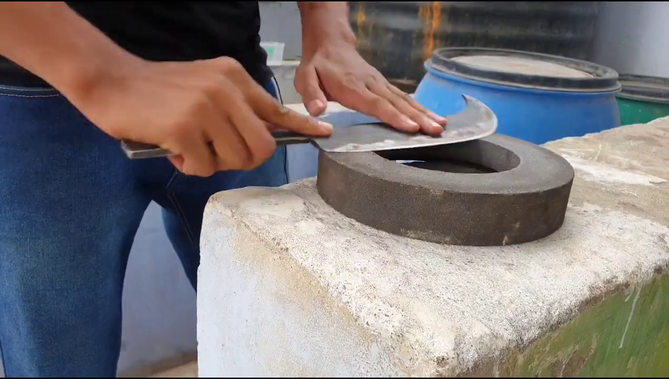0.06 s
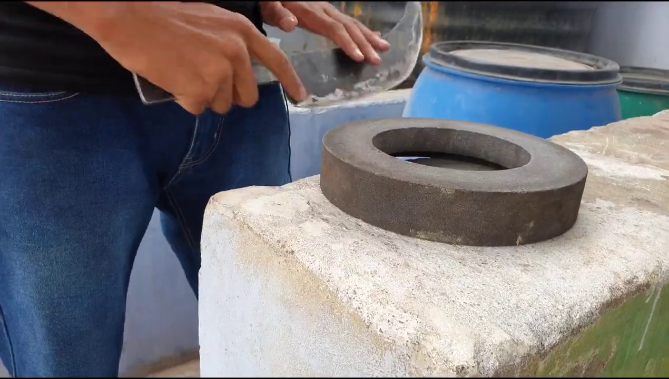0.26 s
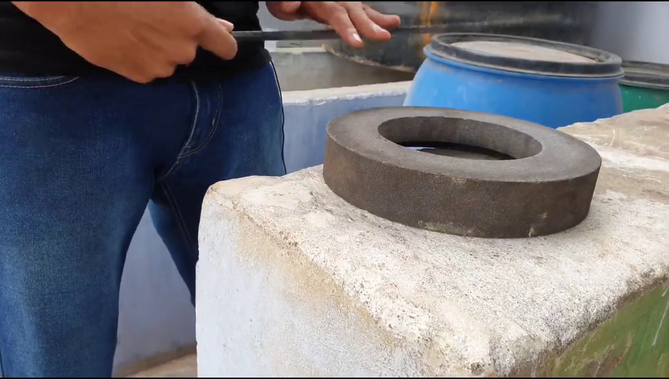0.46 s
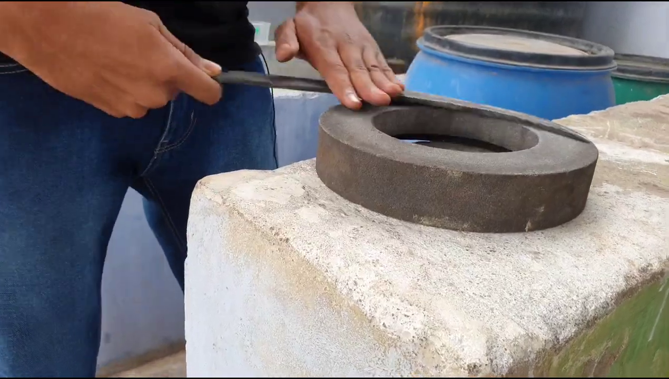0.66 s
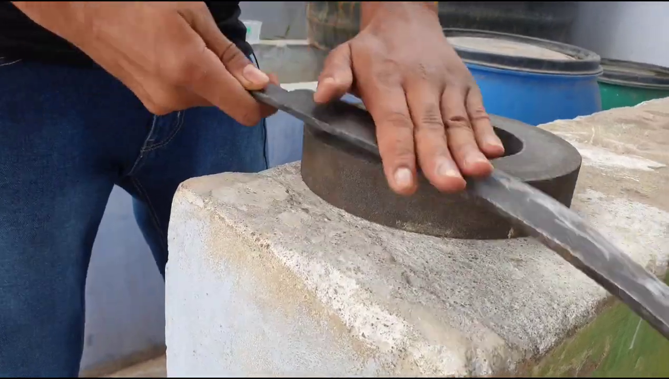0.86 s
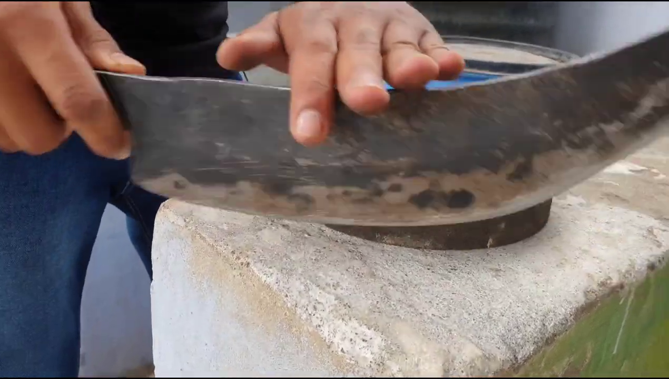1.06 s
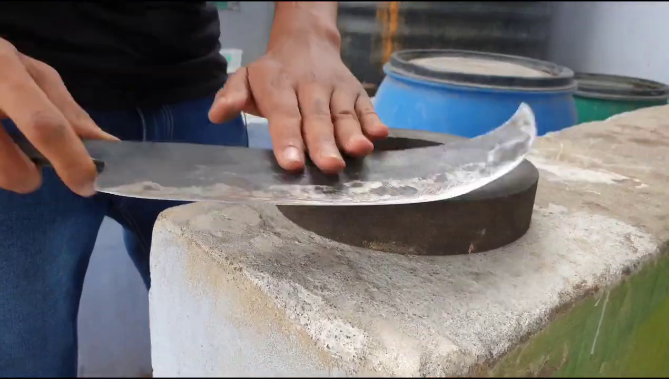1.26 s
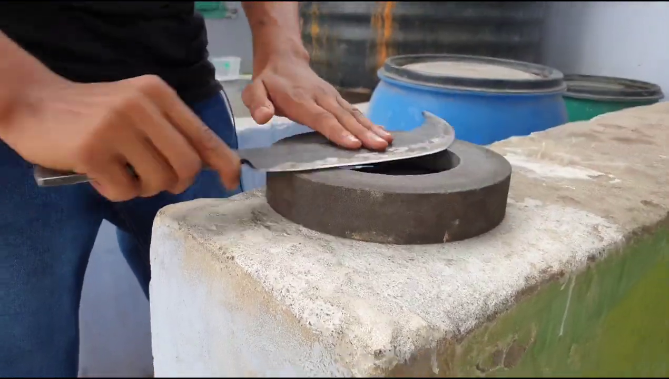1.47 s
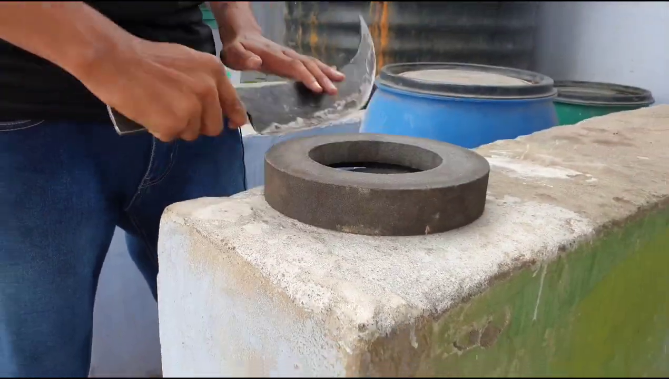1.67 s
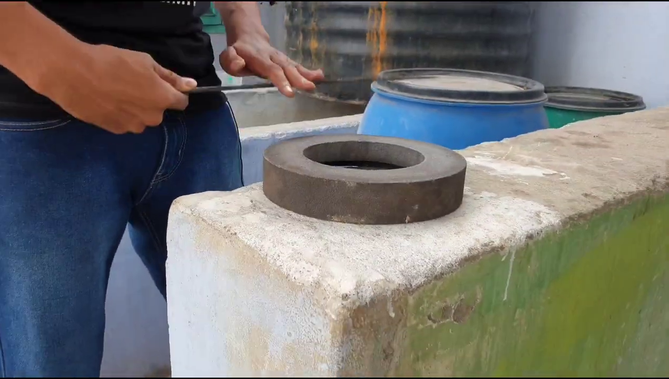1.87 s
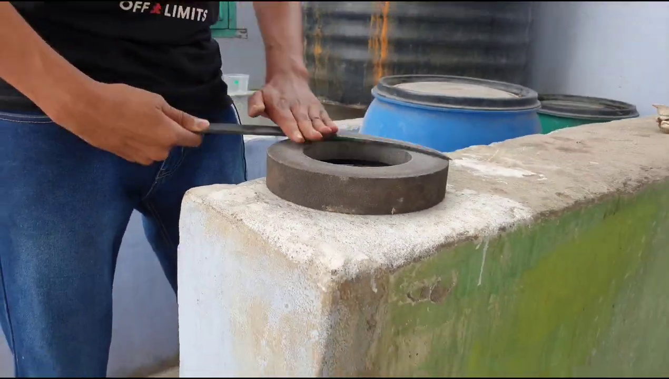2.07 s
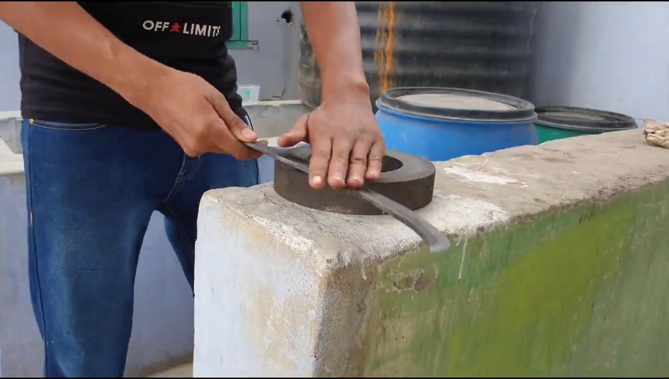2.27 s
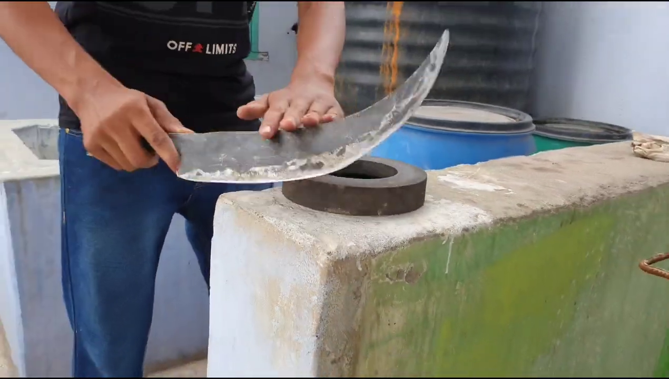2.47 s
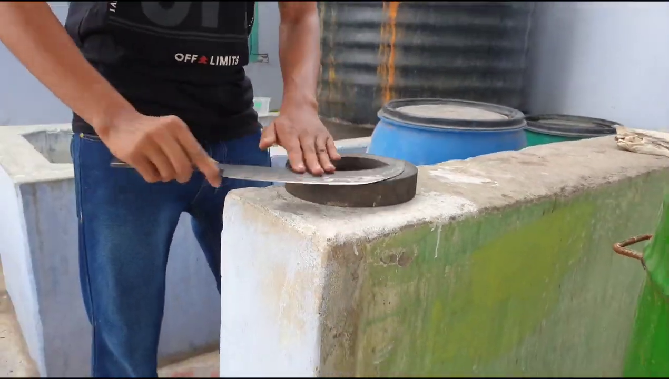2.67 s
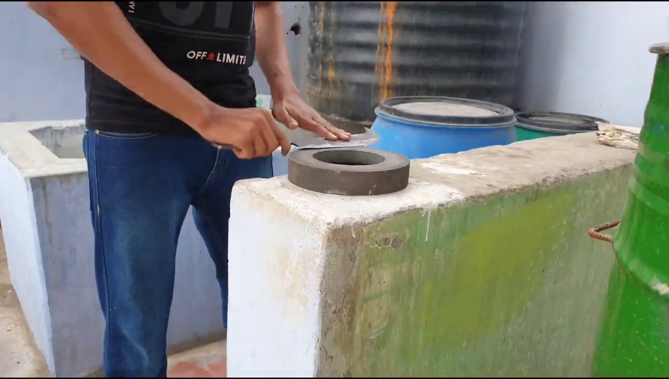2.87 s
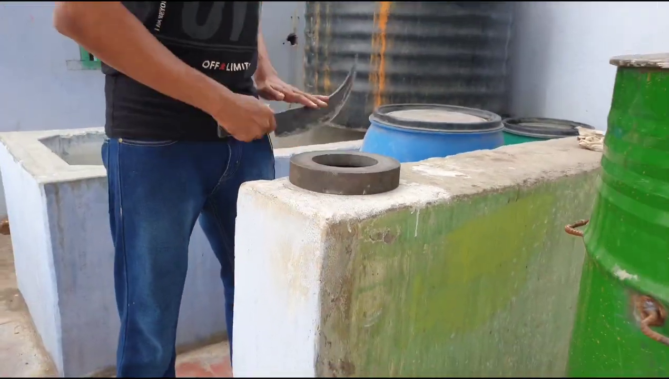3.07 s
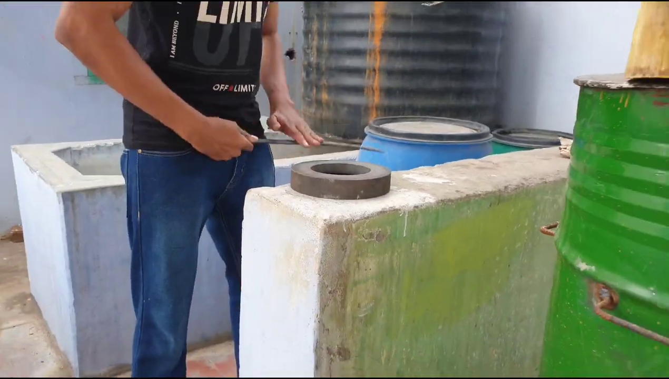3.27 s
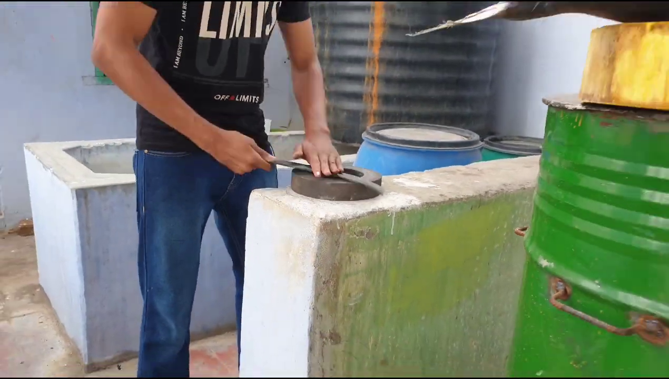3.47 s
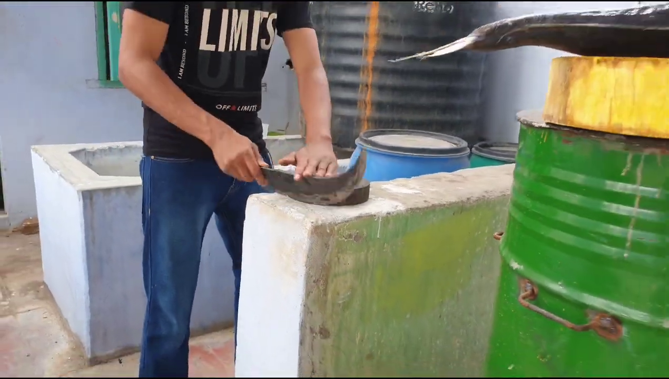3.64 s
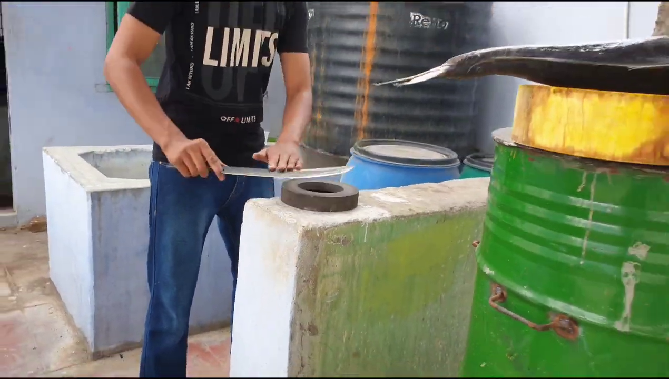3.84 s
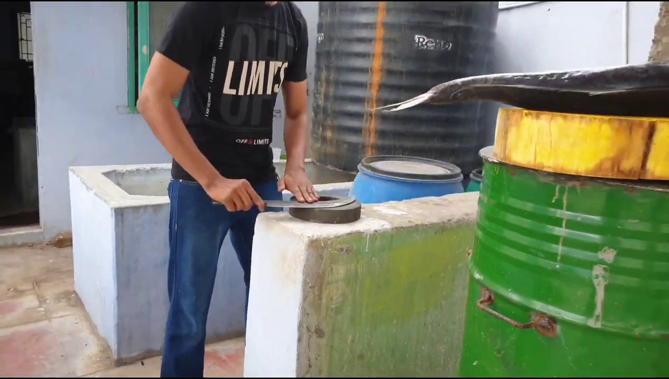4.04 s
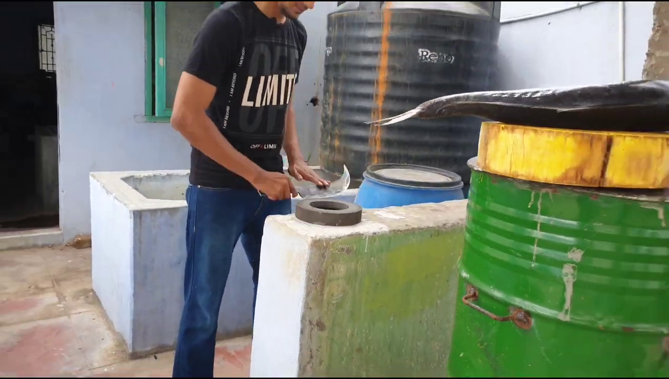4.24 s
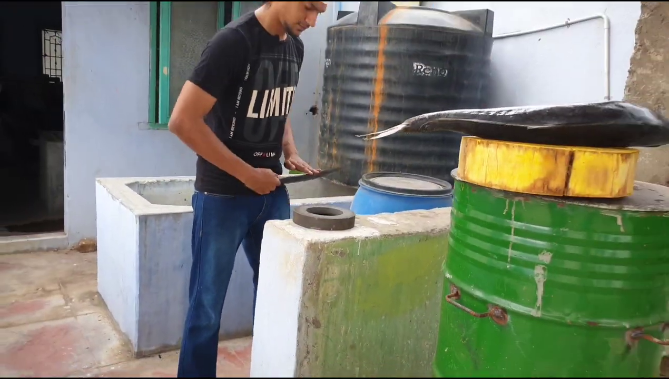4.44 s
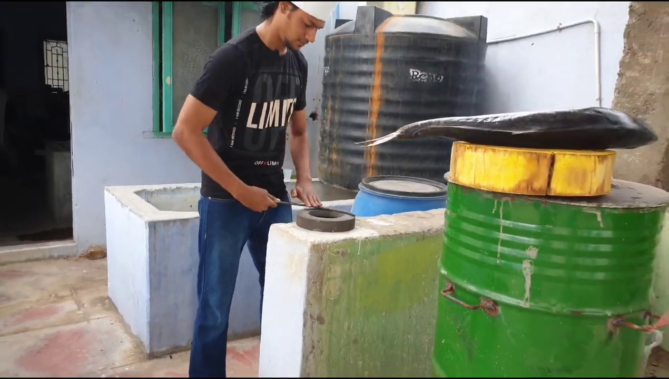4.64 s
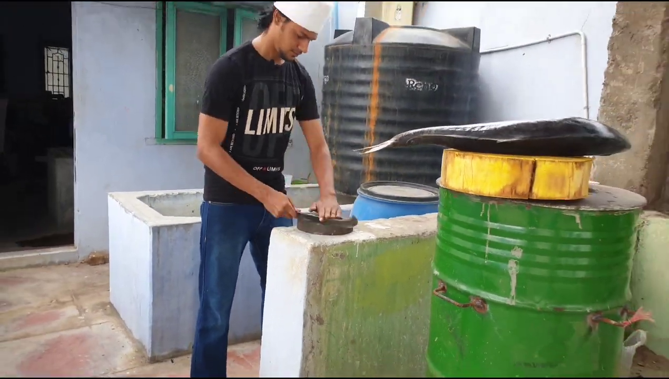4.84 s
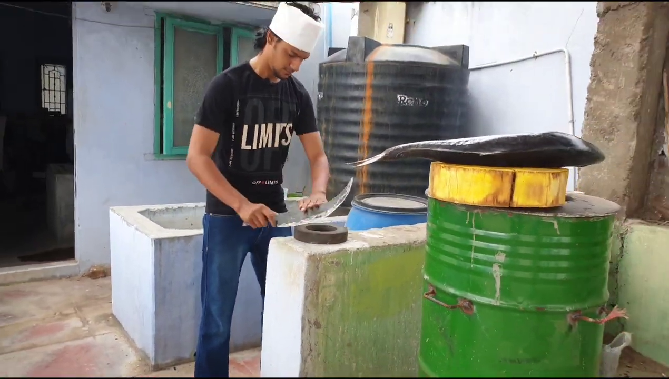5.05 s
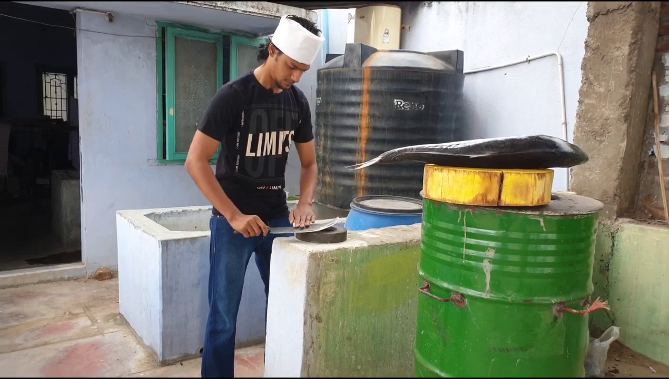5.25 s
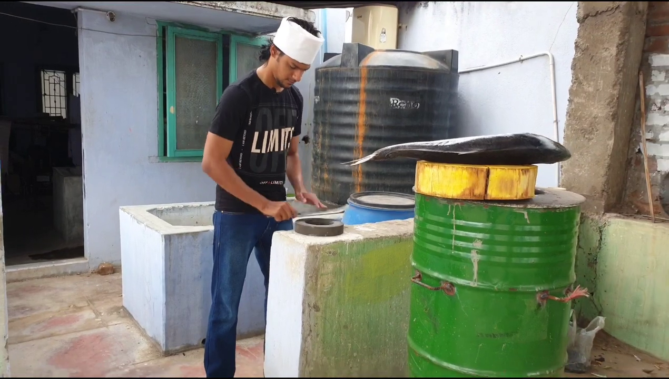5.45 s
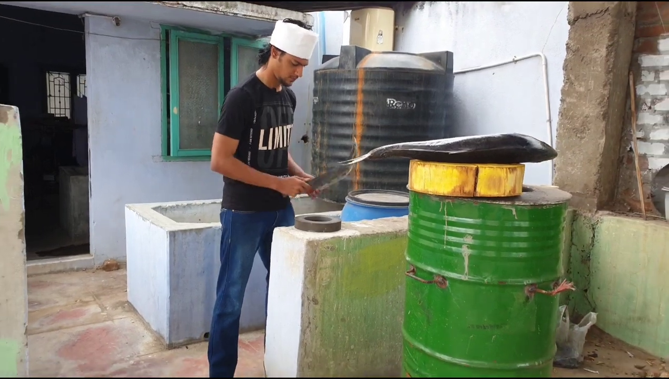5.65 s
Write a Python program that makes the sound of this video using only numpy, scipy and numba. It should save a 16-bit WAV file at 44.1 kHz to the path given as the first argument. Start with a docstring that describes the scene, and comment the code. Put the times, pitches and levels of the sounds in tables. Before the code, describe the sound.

Steady whetting of a big knife on coarse stone: knock, rough metallic rasp, brief ring on lifting, repeated about every 0.7 seconds in a walled yard.

```python
"""A heavy steel blade is whetted on a ring-shaped stone in a walled yard, nine strokes on alternating faces.
Strokes land with knocks, grains of grit drive damped modes of steel and stone, and the lifted blade rings out.
A decaying noise tail gives the walls' return. Behind lie town hush and a distant engine rumble, both of
filtered noise, then a faint far whine of one trembling tone, and a thin high squeal of two in a veil of hiss."""
import sys
import numpy as np
from scipy import signal
from scipy.fft import rfft, irfft
from scipy.io import wavfile
from scipy.ndimage import uniform_filter1d
from numba import njit

SR = 44100
rng = np.random.default_rng(int(sys.argv[2]) if len(sys.argv) > 2 else 0)


def transcribe(signal):
    """Save signal, clipped to [-1, 1], as a 16-bit WAV file at the path in sys.argv[1]."""
    frames = np.atleast_2d(signal).T
    limited = np.clip(frames, -1, 1)
    pcm = np.round(limited * 32767).astype(np.int16)
    wavfile.write(sys.argv[1], SR, pcm)


N = 251811

# strokes on the stone, faces alternating: (lands [s], lifts [s], grumble relative to growl [dB],
# then four lead partials at mid-stroke, relative to the ring [dB])
STROKES = [(0.0, 0.26, -6.5, -9, -6, -18, -9), (0.693, 0.962, -5, -1.5, -4.5, -13, -8),
           (1.404, 1.726, -8, -14, -8.5, -6.5, -17), (2.093, 2.345, -3.5, 2, -1.5, -13, -15),
           (2.784, 3.021, -7.5, -10.5, -2.5, -7.5, -25), (3.427, 3.642, -7.5, -12.5, -1.5, -8, -9.5),
           (4.097, 4.371, -8, -18, -12, -10.5, -7), (4.714, 4.975, -7.5, -13, -11.5, -8.5, -8.5),
           (5.379, 5.488, -1.5, -14, -6, -23, -6.5)]
# the edge springing off at each lift: (looseness of the hand [share of free t60],
# then pluck of each of the four lead partials, relative level [dB])
LIFT = [(0.59, -56, -36.5, -39, -35), (0.59, -36, -31.5, -32, -61), (0.7, -36, -35, -26, -40),
        (0.72, -49, -41, -35.5, -38.5), (0.5, -48, -26, -30, -42.5), (0.59, -50, -65, -36, -62),
        (0.82, -57.5, -39.5, -41.5, -44), (0.73, -44.5, -36, -29, -53), (0.79, -55, -48, -45, -34)]


def from_db(db):
    """Decibels to gain."""
    return np.exp(np.asarray(db) * (np.log(10) / 20))


def rms_one(x):
    """Scale to rms 1."""
    return x / np.sqrt(np.mean(x ** 2) + 1e-20)


def in_time(rows, outside=None):
    """Columns of a curve table, sample by sample."""
    s, *columns = np.transpose(rows)
    t = np.arange(N) / SR
    return np.array([np.interp(t, s, c, outside, outside) for c in columns])


def drift(rate):
    """Smoothed random wander of rms 1, about rate changes a second."""
    step = 40     # samples between the points of the wander
    r = np.exp(-2 * np.pi * step * rate / SR)
    settle = 2000
    noise = rng.standard_normal(N // step + 2 + settle)
    slow = signal.lfilter([1], [1, -2 * r, r * r], noise)[settle:]
    return np.interp(np.arange(N) / step, np.arange(len(slow)), rms_one(slow))


def band(x, low_hz, high_hz):
    """Butterworth band-pass."""
    return signal.sosfilt(signal.butter(2, [low_hz, high_hz], "band", fs=SR, output="sos"), x)


def progress():
    """Which stroke is under way, seconds since it landed, share of it done, whether steel touches stone."""
    lands, lifts = np.transpose(STROKES)[:2]
    t = np.arange(N) / SR
    stroke = np.maximum(np.searchsorted(lands, t, "right") - 1, 0)
    since = t - lands[stroke]
    done = since / (lifts - lands)[stroke]
    touching = (done >= 0) & (done < 1)
    return stroke, since, np.clip(done, 0, 1), touching


def stroke_force():
    """Hand pressure sets the level of four registers: grumble, growl, ring and hiss."""
    # along each stroke, one list apiece: (time [s], ring from hand pressure, relative level [dB],
    # stone growl relative to ring [dB], edge hiss relative to ring [dB])
    pressure = [
        [(0.0, -31, 7.5, 7), (0.02, -31.5, -2, -21), (0.064, -27, 8.5, -4), (0.09, -32.5, 2.5, -7),
         (0.138, -21.5, -4.5, -9), (0.234, -28.5, 3, 1.5), (0.26, -25, -3, -18)],
        [(0.7, -22.5, -15, -18.5), (0.75, -36, -4, 0), (0.774, -27.5, -4, -17), (0.786, -26.5, -2, -6.5),
         (0.894, -28.5, -4, -16), (0.926, -32, 5.5, 2), (0.965, -39, -2, 15.5)],
        [(1.42, -19, 1.5, -31), (1.446, -30.5, -1.5, -12), (1.498, -25.5, 5.5, -3.5), (1.548, -30, -1, -10.5),
         (1.578, -29, 0, -13.5), (1.682, -34, 3, 3.5), (1.72, -42, 4.5, -7)],
        [(2.1, -30, -12, -7), (2.158, -31, 0, -6.5), (2.194, -27, -4, -4), (2.292, -32, 5, -10.5),
         (2.304, -20, -4, -17), (2.322, -47.5, 6, 5.5), (2.345, -24, -16, 2.5)],
        [(2.8, -12.5, -8, -8), (2.824, -32, -0.5, -16), (2.886, -28, -2, -9), (2.906, -36, 1, -3),
         (2.938, -29.5, 3.5, -8), (2.994, -32, -2, -0.5), (3.025, -21.5, -14, -13.5)],
        [(3.435, -29, -11, -5), (3.489, -26.5, -4.5, -7), (3.591, -26.5, -7, -2), (3.601, -37, 2, 2),
         (3.621, -25, 1, -2), (3.631, -26, 2.5, 2.5), (3.65, -35, 3, 10)],
        [(4.11, -26, 3.5, -15), (4.182, -39, 7, 2), (4.232, -30, 2.5, -9), (4.252, -24.5, -3.5, 0.5),
         (4.302, -26, -4, -5.5), (4.334, -30.5, 6.5, 2), (4.37, -40.5, 4, -11)],
        [(4.72, -24.5, -2, -5.5), (4.744, -22, -4.5, -14.5), (4.756, -30, -2, 1), (4.846, -29, -3.5, -5),
         (4.906, -23.5, -2, -7.5), (4.972, -23, -11, -12), (4.975, -28, -17, 1)],
        [(5.385, -22, 9, -6.5), (5.411, -33.5, -1, -20), (5.463, -30, -2.5, -14), (5.475, -39, 0.5, 3),
         (5.485, -33.5, -5, 0)],
    ]
    hand_s = .008     # the hand cannot change its pressure faster
    grumble_late_db, grumble_build_s = np.array([12, 14.5]), np.array([.03, 0.066])     # per face
    stroke, since, done, touching = progress()
    face = stroke % 2
    ring_db, growl_db, hiss_db = uniform_filter1d(in_time(sum(pressure, [])), int(hand_s * SR), axis=1)
    # the heavy stone gets going slowly
    late_db = grumble_late_db[face] * np.exp(-np.abs(since) / grumble_build_s[face])
    grumble_db = growl_db + np.array(STROKES)[stroke, 2] - late_db + drift(60)
    force = touching * from_db(ring_db + np.array([grumble_db, growl_db, np.zeros(N), hiss_db]))
    still_down = np.roll(touching, -SR // 50)
    return force * np.where(still_down, 1, .6)      # pressure eases just before the lift


def knocks(face):
    """Each landing, catch or lift-off tick is an impulse plus a brief noisy chatter of the edge."""
    # the knocks: (time [s], ring, relative level [dB], growl relative to ring [dB], hiss relative to ring [dB])
    hits = [(0.0397, -17, 7, -4.5), (0.109, -15, 9, -19), (0.224, -15.5, 10, -18), (0.6944, -2.5, -13, -13),
            (0.8099, -10.5, 2, -21), (0.8684, -27, -5, -19), (0.9398, -25, -19, 2),
            (0.9555, -15, -0.5, -23), (1.0463, -40.5, 5, -20), (1.4032, 4.5, -18, -8), (1.4159, -3, -4, -9),
            (1.7144, -10, -2.5, -4.5), (2.0931, -4, -6, -6), (2.2032, -6.5, -18, -17.5), (2.323, -20, 5, 9),
            (2.7839, 5.5, -7.5, -5.5), (2.8525, -14, 2, -18), (2.9975, -13.5, 0.5, -22),
            (3.4282, -4, -8.5, -11.5), (3.6261, -10.5, -13, -29), (4.0965, 1, -6, -18.5),
            (4.2205, -12, -0.5, -3), (4.2946, -16.5, 17, -17), (4.3534, -17, 11.5, -5),
            (4.7154, 1.5, -24, -10), (4.8687, -27.5, 1, 10), (4.9593, -8.5, -6, 1),
            (5.3763, -11.5, 13.5, 1), (5.4153, -14.5, 9, -12), (5.4464, -19, -19, -8),
            (5.4698, -20.5, -9, 3.5)]
    # decay time of the chatter, one per face [s]
    chatter_s = [0.0088, .0042]
    chatter, impulse = np.zeros((4, N)), np.zeros((4, N))
    for s, ring_db, growl_db, hiss_db in hits:
        i = round(s * SR)
        after = np.arange(min(N - i, 4000)) / SR
        strength = from_db(ring_db + np.array([[growl_db], [0], [hiss_db]]))
        # register 0 stays still: too brief to move the heavy stone
        chatter[1:, i:i + len(after)] += strength * np.exp(-after / chatter_s[face[i]])
        impulse[1:, i] = strength[:, 0]
    return from_db(-15.5) * chatter * rng.standard_normal(N) + from_db(7.5) * impulse


def grit(median_per_s, spread_db, smooth):
    """Grains of the stone catch the edge in clumps, over a smooth rub."""
    sizes = from_db(spread_db * np.minimum(rng.exponential(1, N), 5)) * rng.choice([-1, 1], N)
    born = rng.random(N) < median_per_s * from_db(4.0 * drift(40)) / SR
    return rms_one(rms_one(sizes * born) + smooth * rng.standard_normal(N))


def damping():
    """Share of the stone's damping still acting, and the looseness of the hand."""
    let_go_s = 0.0087     # damping by the stone fades after the lift
    stroke, since, done, touching = progress()
    lifted = since - np.diff(np.array(STROKES)[:, :2])[stroke, 0]
    held = np.exp(-np.clip(lifted, 0, 1) / let_go_s)
    return held, np.array(LIFT)[stroke, 0]


@njit
def resonate(force, radius, cos_w):
    """Two-pole mode whose damping changes from sample to sample."""
    out = np.zeros(len(force))
    for i in range(2, len(force)):
        push = force[i] - force[i - 2]
        out[i] = push + 2 * radius[i] * cos_w * out[i - 1] - radius[i] ** 2 * out[i - 2]
    return out


def mode(drive, grip, hz, width_hz, t60, pluck=0):
    """Pressure damps a mode until the blade lifts, then only the hand does; peak gain 1 while pressed."""
    held, loose = grip
    pressed = np.exp(-np.pi * width_hz / SR)
    free = from_db(-60 / (t60 * loose * SR))
    radius = held * pressed + (1 - held) * free
    return resonate((drive * (1 - pressed ** 2) + pluck) / 2, radius, np.cos(2 * np.pi * hz / SR))


def lead_partials(force, grains, impact, grip):
    """The strongest partials grow or sink over each stroke and wander at random in level; the lift plucks them."""
    # lead partials of the steel: (width while pressed [Hz], free t60 [s], twin level [dB], growth over a stroke [dB])
    lead = [(37.2, 0.167, 0, -1.5), (28, 0.95, -23, 12), (40, 0.48, -13.5, 3.5), (62, 0.65, -26.5, 6.5)]
    # their pitches [Hz]
    lead_hz = [2658, 3224, 3888, 4722]
    # pitch of the close neighbour of each [Hz]
    twin_hz = [2712, 3160, 3932, 4770]
    stroke, since, done, touching = progress()
    pressing = touching & np.roll(touching, -SR // 60)     # the rub stops driving them just before the lift
    lifts = (np.array(STROKES)[:, 1] * SR).astype(int) + 1
    out = np.zeros(N)
    for k, (width_hz, t60, twin_db, growth_db) in enumerate(lead):
        level_db = np.array(STROKES)[stroke, 3 + k] + growth_db * (done - .5) + 3.5 * drift(8.8)
        rub = from_db(level_db) * force * pressing * grains
        drive = (rub + from_db(-13.5) * impact) / np.sqrt(np.pi * width_hz / SR)
        pluck = np.zeros(N)
        pluck[lifts] = from_db(np.array(LIFT)[:, k + 1])
        pair = mode(drive, grip, lead_hz[k], width_hz, t60, pluck)
        # the pair beats
        pair += from_db(twin_db) * mode(drive, grip, twin_hz[k], width_hz, 0.84 * t60, pluck)
        out += pair * from_db(1.42 * drift(22))      # the ringing flickers in level
    return out


def rasp(scrape, grains, low_hz, high_hz, level_db):
    """Grit heard directly between the modes, as a band of the scraping force."""
    def twice(x):
        return band(band(x, low_hz, high_hz), low_hz, high_hz)
    return from_db(level_db) / np.std(twice(grains)) * twice(scrape * from_db(3.27 * drift(23)))


def whetting():
    """Grit and impacts drive every mode of steel and stone and are also heard directly."""
    # modes of the stone: (pitch [Hz], first face, relative level [dB], second face, relative level [dB],
    # width while pressed [Hz], free t60 [s])
    stone = [(310.6, -16.5, -24, 56, 0.31), (642, -9, -16.5, 52, 0.37), (980.6, 1, -7, 14, 0.1),
             (1430, 4, -3, 69, .07), (1713, -2, -21, 46, 0.07), (2017, 5, -7.5, 113, 0.063)]
    # lesser partials of the steel: (first face, relative level [dB], second face, relative level [dB],
    # width while pressed [Hz], free t60 [s])
    steel = [(-7, -3.5, 25, 0.097), (-6.5, -2.5, 5, 0.27), (-10.5, -7.5, 32, 0.23), (-15.5, -2.5, 29, .13),
             (-39, -26, 7.2, 0.37), (-7.5, -7.5, 30, 0.55), (-17.5, -9.5, 183, 0.15),
             (-12.5, -12, 17, 0.16), (-19.5, -11, 89, 0.05), (-17.5, -19.5, 160, 0.072),
             (-21.5, -24, 99, 0.14), (-23.5, -9.5, 38, 0.047), (-16, -15.5, 140, 0.22),
             (-22, -10, 43, 0.043), (-9.5, -15.5, 43, 0.2), (-20, -14.5, 110, 0.045), (-17, -25.5, 55, .12),
             (-14, -16, 60, 0.1172), (-25.5, -20, 54, 0.097), (-17.5, -21, 31, 0.1), (-24, -22, 80, .12),
             (-24, -33.5, 61, .11), (-29, -21.5, 68, 0.19), (-36.5, -29, 80, .1), (-44, -42, 77, .09),
             (-32, -35, 110, .09), (-32, -18.5, 65, .09)]
    # their pitches [Hz]
    steel_hz = [2460, 3160, 3520, 4480, 4770, 4935, 5350, 5580, 6170, 6330, 6580, 7030, 7470, 7960, 8230,
                8870, 9210, 9980, 10330, 11200, 11380, 12480, 12720, 13770, 14000, 14400, 15250]
    # direct rasp in each register: (low edge [Hz], high edge [Hz], relative level [dB])
    rasp_bands = [(466, 764, 1.5), (847, 2637, -0.5), (2250, 7800, -13), (6150, 14000, -12)]
    # relative level of the stone modes and lesser partials in each register [dB]
    share_db = [-2, -1.54, -6.5, 2.72]
    face = progress()[0] % 2
    force, impact = stroke_force(), knocks(face)
    grip = damping()
    grains = grit(median_per_s=3500, spread_db=4.0, smooth=0.89)
    scrape = force * grains + impact
    modes = np.array(stone + [(hz, *row) for hz, row in zip(steel_hz, steel)])
    register = np.searchsorted([low for low, high, db in rasp_bands[1:]], modes[:, 0])
    out = np.zeros(N)
    for k, (low_hz, high_hz, rasp_db) in enumerate(rasp_bands):
        group = modes[register == k]
        power = np.pi / SR * group[:, 3] @ from_db(group[:, 1:3]) ** 2      # of all modes under unit noise, per face
        drive = scrape[k] / np.sqrt(power[face]) * from_db(share_db[k])
        for m, (hz, first_db, second_db, width_hz, t60) in enumerate(group):
            # level wanders at random
            coupling_db = np.where(face, second_db, first_db) + 3.8 * drift(17.3)
            ringing = mode(drive * from_db(coupling_db), grip, hz, width_hz, t60)
            out += (-1) ** m * ringing * from_db(1.1 * drift(25))
        out += rasp(scrape[k], grains, low_hz, high_hz, rasp_db)
    out += lead_partials(force[2], grains, impact[2], grip)
    soft_bass = signal.butter(2, 280, "high", fs=SR)      # so small a body radiates little bass
    return from_db(-4) * signal.lfilter(*soft_bass, out)


def walls(x):
    """Diffuse, dulled return from the walls and tanks nearby, as a decaying noise tail."""
    t60_s, level_db, cut_hz = 0.27, -12.5, 10000
    t = np.arange(SR // 2) / SR
    tail = rng.standard_normal(len(t)) * from_db(-60 * t / t60_s) * (t > .004)
    tail = signal.lfilter(*signal.butter(1, cut_hz, fs=SR), tail)
    return from_db(level_db) * signal.fftconvolve(x, tail / np.linalg.norm(tail))[:N]


def town_hush():
    """Smooth noise shaped by a spectrum, its level barely drifting."""
    # spectrum of the hush: (frequency [Hz], relative density [dB per Hz])
    spectrum = np.array([(15, -49.5), (28, -12), (69, -7), (207, -7.5), (318, -6.5), (475, -13), (543, -10),
                         (879, -12), (1210, -13), (1420, -15.5), (1860, -14), (3090, -22.5), (3350, -21.5),
                         (5880, -29.5), (15000, -56)])
    hz = np.maximum(np.fft.rfftfreq(N, 1 / SR), 1)
    shape_db = np.interp(np.log(hz), np.log(spectrum[:, 0]), spectrum[:, 1])
    hush = irfft(rfft(rng.standard_normal(N)) * from_db(shape_db), N)
    hush /= np.std(band(hush, 150, 6000))
    return from_db(-51 + 0.31 * drift(6)) * hush


def engine_rumble():
    """A distant engine as a narrow low band of noise that swells and sinks."""
    # level of the rumble: (time [s], level [dB])
    swell = [(0.0, -49), (0.14, -57), (0.32, -51), (0.7, -59), (1.0, -58), (2.93, -66), (3.08, -60),
             (3.5, -73), (4.42, -55), (4.82, -53.5), (5.22, -56), (5.71, -61)]
    level_db, = in_time(swell)
    return from_db(level_db) * rms_one(band(rng.standard_normal(N), 67.4, 83.6))


def wavering(rows, waver, flutter_db, rate):
    """A thin sine tone whose pitch and level each tremble at random."""
    hz, level_db = in_time(rows)[0], in_time(rows, outside=-200)[1]
    phase = 2 * np.pi * np.cumsum(hz * (1 + waver * drift(rate))) / SR
    return np.sqrt(2) * from_db(level_db + flutter_db * drift(rate)) * np.sin(phase)


def far_whine():
    """A faint far whine, one trembling tone."""
    # path of the whine: (time [s], pitch [Hz], level [dB])
    path = [(.98, 1210, -66), (1.04, 1260, -56), (1.12, 1248, -57), (1.36, 1216, -58), (1.42, 1200, -75)]
    return wavering(path, waver=0.012, flutter_db=3.0, rate=26.1)


def squeal():
    """Two thin trembling tones in a veil of high hiss."""
    # paths of the two tones, one list apiece: (time [s], pitch [Hz], level [dB])
    lines = [
        [(4.53, 10800, -80), (4.59, 10800, -73), (4.605, 11600, -71), (4.71, 11865, -69.5)],
        [(4.535, 11800, -90), (4.56, 13000, -78.5), (4.61, 14500, -78), (4.68, 15500, -77.5),
         (4.71, 15500, -78)],
    ]
    veil_db = in_time([(4.52, -100), (4.56, -75), (4.70, -74), (4.72, -100)], outside=-200)[0]
    hiss = from_db(veil_db) * rms_one(band(rng.standard_normal(N), 10500, 14500))
    lower = wavering(lines[0], waver=0.0155, flutter_db=4.0, rate=250)
    upper = wavering(lines[1], waver=.004, flutter_db=4.3, rate=120)
    return lower + upper + hiss


def scene():
    """Blade and its return from the walls over the sounds around the yard."""
    blade = whetting()
    surroundings = town_hush() + engine_rumble() + far_whine() + squeal()
    return (blade + walls(blade) + surroundings)[None]


def record(dry):
    """Peaks are rounded; treble falls away steeply near 15.7 kHz, with next to nothing above 16.5 kHz."""
    rounded = 0.94 * np.tanh(dry / 0.94)
    soft = signal.sosfilt(signal.cheby2(8, 30, 15750, fs=SR, output="sos"), rounded)
    return signal.sosfilt(signal.cheby2(12, 70, 16500, fs=SR, output="sos"), soft)


dry = scene()
out = record(dry)
transcribe(out)
```